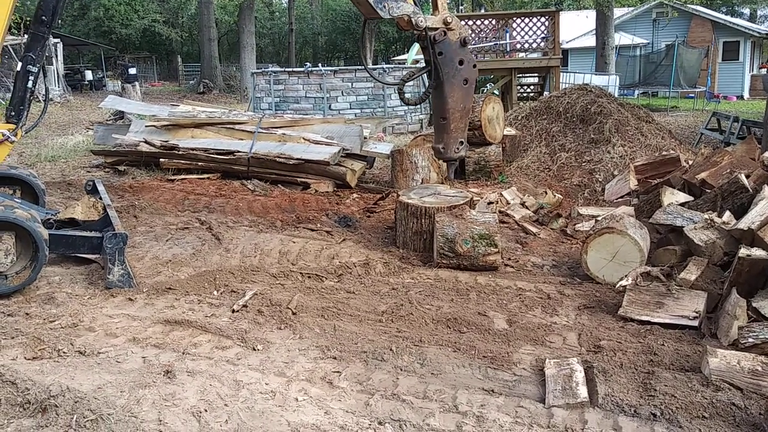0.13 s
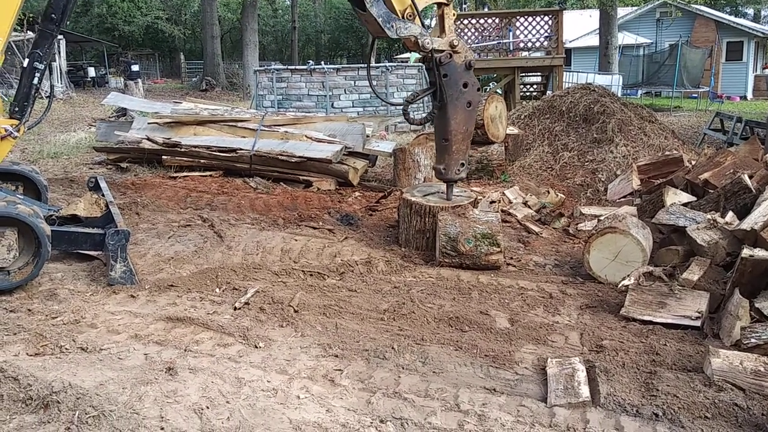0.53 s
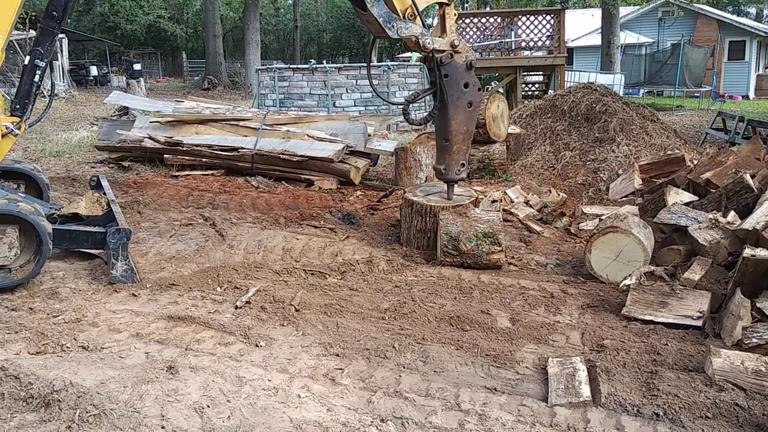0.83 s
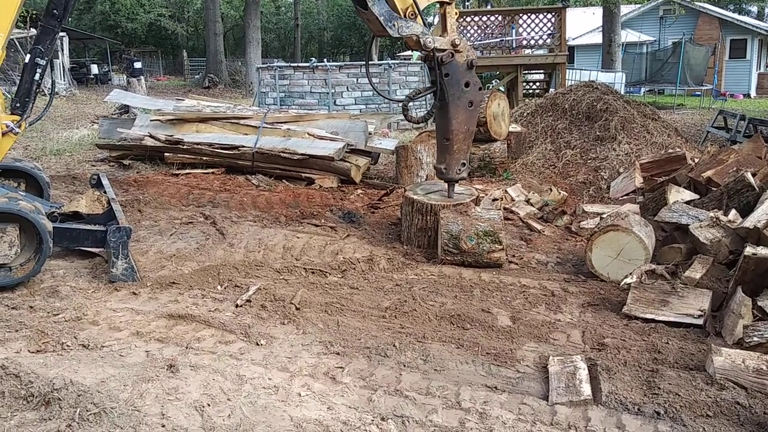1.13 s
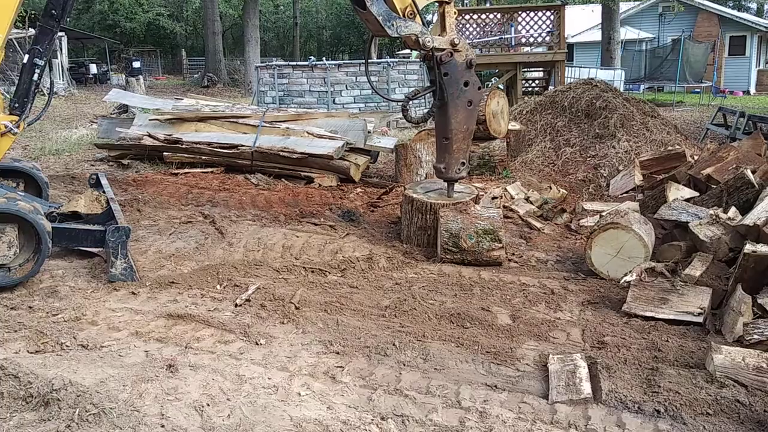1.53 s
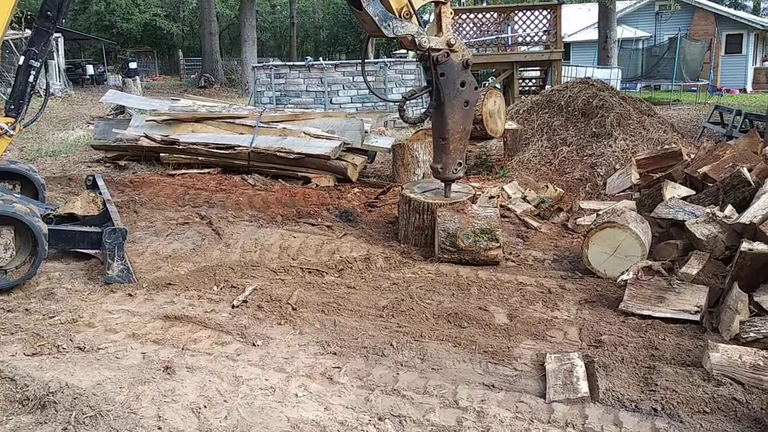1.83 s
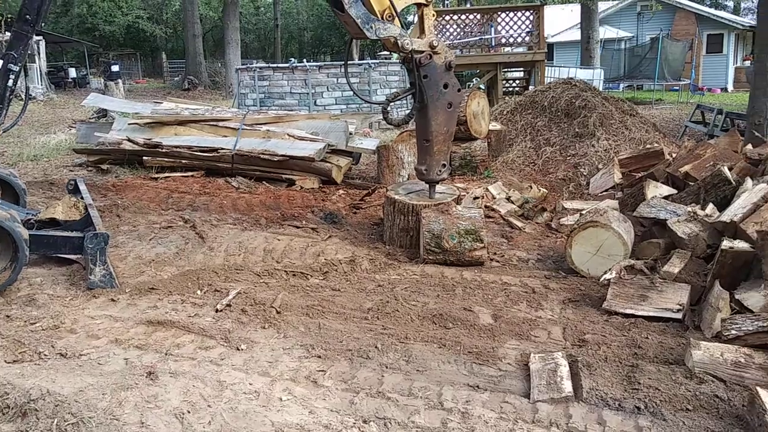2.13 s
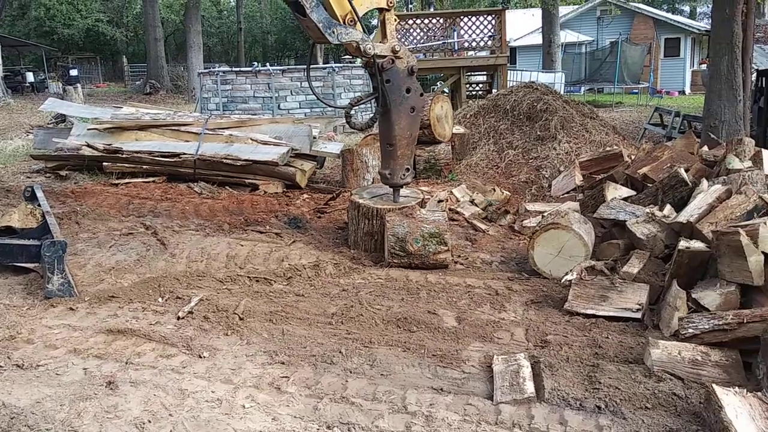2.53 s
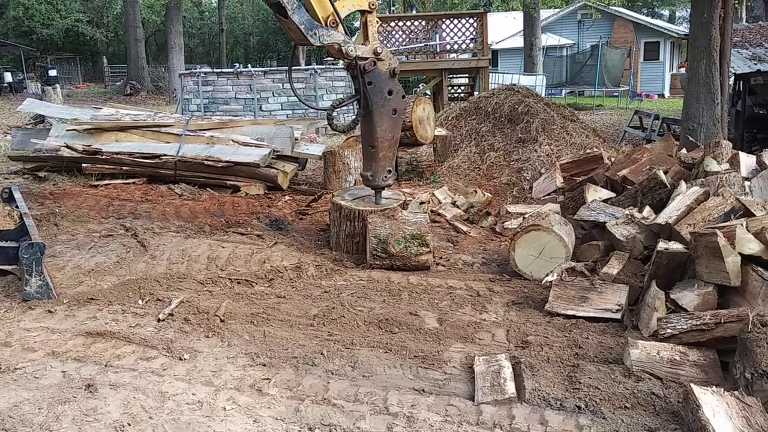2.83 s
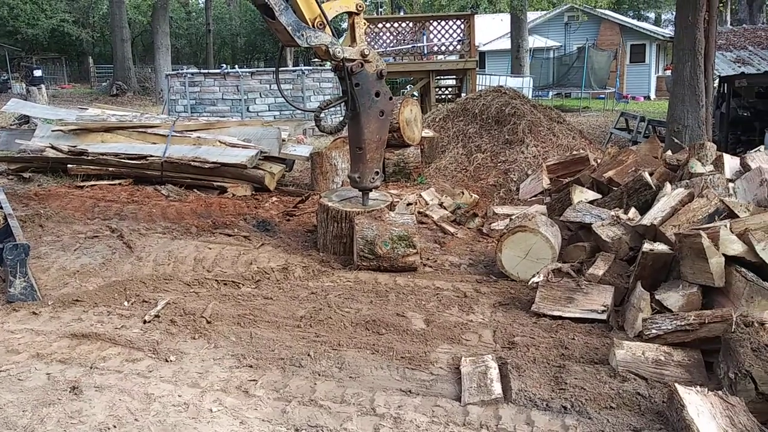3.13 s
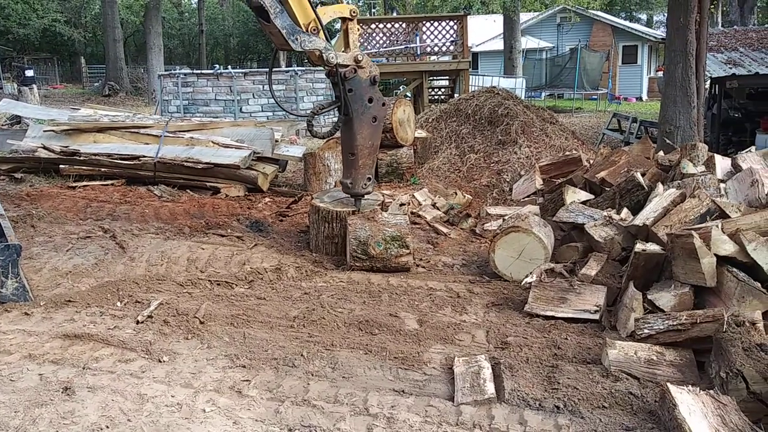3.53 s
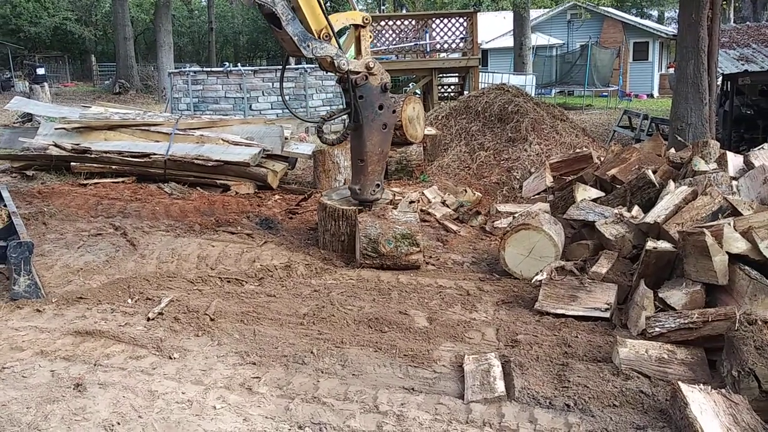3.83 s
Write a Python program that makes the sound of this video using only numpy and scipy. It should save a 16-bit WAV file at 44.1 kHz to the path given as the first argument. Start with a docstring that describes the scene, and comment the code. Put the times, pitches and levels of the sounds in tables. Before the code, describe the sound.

Hydraulic breaker hammers a log in rapid, loud metallic blows over a rumbling diesel engine

```python
"""In a yard, a hydraulic breaker on a small excavator is set down on a log with a clank and a rattle.
It then hammers about 14 times a second: ringing steel, thumps of the log and crashes of noise.
Low knocks and a crackle of short grains tell of tearing wood, and fading noise makes the yard's answer.
Behind, coloured noise and steady tones make a diesel with pump hum and a high whistle.
The blows overload the input."""
import sys
import numpy as np
from scipy import signal
from scipy.fft import rfft, irfft, next_fast_len
from scipy.io import wavfile
from scipy.ndimage import uniform_filter1d, map_coordinates

SR = 44100
rng = np.random.default_rng(int(sys.argv[2]) if len(sys.argv) > 2 else 0)


def waveform_to_disk(signal):
    """Save audio, clipped to [-1, 1], as 16-bit WAV at the path in sys.argv[1]."""
    frames = np.transpose(np.atleast_2d(signal))
    scaled = np.clip(frames, -1, 1) * 32767
    samples = np.round(scaled).astype(np.int16)
    wavfile.write(sys.argv[1], SR, samples)


def convert_level_to_amplitude(level_db):
    """Map a level in decibels to its linear amplitude factor."""
    exponent = np.asarray(level_db, float) / 20
    return 10 ** exponent


N = 176400  # samples, 4 s


def along(points, hz):
    """Reads a curve of (frequency [Hz], value) points on a logarithmic frequency axis."""
    f, v = np.transpose(points)
    return np.interp(np.log(hz + 1), np.log(f + 1), v)


def unit(x):
    """Scales a sound to rms 1."""
    return x / np.sqrt(np.mean(x ** 2) + 1e-20)


def curves(rows):
    """Gives one value per sample for each column after the time."""
    s, *cols = np.transpose(rows)
    return [np.interp(np.arange(N) / SR, s, c) for c in cols]


def wobble(rate):
    """A smooth random curve with rate knots a second."""
    knots = rng.standard_normal(int(N * rate / SR) + 4)
    return map_coordinates(knots, [np.arange(N) * rate / SR])


def coloured(x, gain):
    """Multiplies the spectrum of x by a gain that depends on frequency."""
    m = next_fast_len(len(x) + 8192)
    return irfft(rfft(x, m) * gain(np.fft.rfftfreq(m, 1 / SR)), m)[:len(x)]


def dying(t60s, size, spectrum=((1, 0), (2, 0)), rise=((1, 1e-5),)):
    """Noise whose every frequency swells and dies at its own speed."""
    hz, t, z = signal.stft(rng.standard_normal(size), SR, nperseg=128)
    colour = convert_level_to_amplitude(along(spectrum, hz))[:, None]
    colour = colour / np.sqrt(np.mean(colour ** 2))
    rise_s = np.maximum(along(rise, hz), 1e-5)[:, None]
    swell = 1 - np.exp(-(t + .0007) / rise_s)
    decay = convert_level_to_amplitude(-60 * t / along(t60s, hz)[:, None])
    return signal.istft(z * swell * colour * decay, SR, nperseg=128)[1][:size]


def ring(modes, t, shorter=1, favour_hz=None, slope_db=9.5):
    """Modes that swell to a late peak and die, each a detuned pair with a new level and a wandering phase.

    Levels fall by slope_db per octave away from the nearest favoured frequency."""
    hz, db, t60, late, spread = np.repeat(np.transpose(modes), 2, axis=1)[:, :, None]
    detune, scatter = rng.standard_normal((2,) + hz.shape)
    start = rng.random(hz.shape)
    late = np.maximum(late * shorter, 1e-4)
    swell = np.sin(np.pi / 2 * np.minimum(t / late, 1)) ** 2
    if favour_hz:
        octaves = np.abs(np.log2(hz / np.array(favour_hz))).min(axis=1, keepdims=True)
        db = db - slope_db * octaves
    # the phase takes a random step every 64 samples, larger for a wider spread
    steps = rng.standard_normal((len(hz), len(t) // 64 + 1)) * np.sqrt(.9 * spread * 64 / SR)
    wander = np.repeat(np.cumsum(steps, axis=1), 64, axis=1)[:, :len(t)]
    wander = uniform_filter1d(wander, size=64, axis=1)
    tone = np.sin(2 * np.pi * ((hz + spread * detune) * t + start) + wander)
    decay_db = -60 * np.maximum(t - late, 0) / (t60 * shorter)
    level = convert_level_to_amplitude(db + 1 * scatter + decay_db)  # 1 dB of scatter from strike to strike
    return np.sum(level * swell * tone, axis=0)


# colour of the engine clatter, only its shape counts: (frequency [Hz], level [dB per Hz])
CLATTER_COLOUR = [(26, -51), (45, -28), (202, -10), (271, -16), (401, -16.5), (465, -17), (552, -12),
                  (1710, -12.5), (4460, -27.5), (7850, -20.5), (11100, -51), (16000, -48)]
# loudness of the clatter before a 1.5 dB cut and a random waver: (time [s], level [dB])
CLATTER_LEVEL = [ [(0.0, -28.5), (0.128, -33), (0.52, -30.5)], ][0] + [(.9, -31), (1.2, -34.5), (4, -26)]


def clatter(turns):
    """Diesel clatter: coloured noise that pulses a little with each firing."""
    level_db, = curves(CLATTER_LEVEL)
    noise = unit(coloured(rng.standard_normal(N), lambda hz: convert_level_to_amplitude(along(CLATTER_COLOUR, hz))))
    pulse = 1 + 0.11 * np.cos(2 * np.pi * turns)
    return noise * pulse * convert_level_to_amplitude(level_db - 1.5 + 2.4 * wobble(8))


# shaft and pump tones, before a 1.5 dB cut and a random waver: (multiple of firing rate [x], level [dB])
SHAFT_TONES = [(2, -56), (3, -52), (5.5, -80.5), (6, -44.5), (11, -43), (12, -43.5), (16, -44.5), (48, -42),
               (60, -47)]


def shaft_and_pump(turns):
    """Hum of shaft and pump: sine tones locked to the firing, each wavering in level."""
    hum = np.zeros(N)
    for k, db in SHAFT_TONES:
        level = convert_level_to_amplitude(db - 1.5 + 1.34 * wobble(26))
        hum += level * np.sin(2 * np.pi * k * turns + k * k)
    return hum


# the high whistle glides and fades: (time [s], frequency [Hz], level [dB])
WHISTLE_PATH = [(0, 7850, -37), (.3, 7920, -44), (.5, 7900, -34), (.7, 8000, -60), (1.2, 7440, -66),
                (4, 8500, -55)]


def whistle():
    """A hissing whistle: two slow noises carried by a gliding tone make one narrow band."""
    width_hz = 330  # half amplitude this far to either side
    hz, db = curves(WHISTLE_PATH)
    in_phase, quarter_turn = [
        unit(coloured(rng.standard_normal(N), lambda f: 1 / (1 + (f / width_hz) ** 2))) for _ in range(2)]
    phase = 2 * np.pi * np.cumsum(hz) / SR
    return convert_level_to_amplitude(db) * (in_phase * np.cos(phase) + quarter_turn * np.sin(phase))


def engine():
    """The diesel: clatter and tones share one slightly uneven firing rate; the whistle is free of it."""
    firing_hz = 34.62 * (1 + 0.0042 * wobble(1.8))
    turns = np.cumsum(firing_hz) / SR  # firings so far
    return clatter(turns) + shaft_and_pump(turns) + whistle()


# how long the yard's answer takes to fall by 60 dB: (frequency [Hz], t60 [s])
YARD_T60 = [(200, 0.32), (1000, 0.48), (4000, 0.8), (9000, 0.7)]


def yard(x):
    """Houses, trees and wood piles answer with dying noise; a new tail for each short stretch."""
    delay_s, level_db = .025, -7.5
    out, step = np.zeros(N + 2 * SR), SR // 8
    for i in range(0, N, step):
        tail = dying(YARD_T60, SR)
        wet = signal.fftconvolve(x[i:i + step], tail / np.linalg.norm(tail))
        out[i + round(delay_s * SR):][:len(wet)] += wet
    return convert_level_to_amplitude(level_db) * out[:N]


# the log rocks, then gives way: (time [s], frequency [Hz], level [dB], t60 [s])
LOG_KNOCKS = [(.555, 203, -18, 0.071), (0.813, 253, -24, 0.084), (3.703, 212, -2, 0.056),
              (3.74, 342, -7, 0.069), (3.794, 409, -9.5, 0.084)]


def knocks():
    """Low knocks of the log: sine tones that start softly and die away."""
    out = np.zeros(N)
    for s, hz, db, t60 in LOG_KNOCKS:
        t = np.maximum(np.arange(N) / SR - s, 0)
        out += convert_level_to_amplitude(db - 60 * t / t60) * (1 - np.exp(-t / 0.0056)) * np.sin(2 * np.pi * hz * t)
    return out


# loudness of the tearing wood: (time [s], level [dB])
TEARING_LEVEL = [(0, -60), (3.0, -68), (3.3, -24.5), (3.55, -22.5), (3.75, -24), (3.82, -21.5), (4, -50)]


def splinters():
    """Tearing fibres: a crackle of short dying tones at random times, pitches and sizes."""
    count, middle_hz, spread_octaves, sizes_db, cycles = 900, 1087, 1.056, 6.5, 3
    pitch, size = rng.standard_normal((2, count, 1))
    when = rng.uniform(3 * SR, N, (count, 1)).astype(int)  # from 3 s on
    hz = np.clip(middle_hz * 2 ** (spread_octaves * pitch), 350, 8000)
    k = np.arange(1500)
    decay = np.exp(-k * hz / (SR * cycles))
    grains = convert_level_to_amplitude(sizes_db * size) * decay * np.sin(2 * np.pi * hz * k / SR)
    crackle = np.bincount((when + k).ravel(), grains.ravel(), N + len(k))[:N]
    level_db, = curves(TEARING_LEVEL)
    return convert_level_to_amplitude(level_db) * crackle / np.std(crackle[3 * SR:])


# colour of a strike's noise, only its shape counts: (frequency [Hz], level [dB per Hz])
CRASH_COLOUR = [(35, -69), (60, -25.5), (492, 1), (1550, -3.5), (2000, 5), (3500, -6), (4530, 0.5),
                (6000, -12), (7750, 2.5), (9350, -23), (16000, -40)]
# decay of a blow's noise, scaled by "shorter" for other strikes: (frequency [Hz], t60 [s])
CRASH_DECAY = [(100, 0.32), (500, 0.32), (2000, 0.17), (5000, 0.17), (10000, 0.15)]
# how slowly that noise swells, scaled likewise: (frequency [Hz], rise [s])
CRASH_SWELL = [(300, 0.021), (1000, 0.0032), (3000, 0.0046), (6000, 0.0027)]
# thump of log and housing, times scaled by the root of "shorter":
# (frequency [Hz], level [dB], t60 [s], peak after [s], spread [Hz])
LOG_MODES = [(231.7, -1, 0.11, 0.0064, 8), (365.6, -13, 0.16, .018, 3.9), (448.5, -8, 0.05, 0.038, 10.7),
             (500, -6.5, .2, 0.017, 4.5), (589.2, -7, .2, 0.013, 5.6), (659.7, -8.5, 0.15, 0.031, 8.7),
             (757.3, -18.5, 0.18, 0.048, 5.5), (1005.3, -11.5, 0.075, 0.021, 9.6)]
# the log's favoured tone as the tool sinks in: (time [s], frequency [Hz])
LOG_FAVOURED = [(0, 603), (1.2, 500), (1.9, 520), (2.2, 615), (3, 560), (3.3, 670), (3.7, 517)]


def strikes(events, steel_ring, crash_over_db, shorter):
    """Each strike rings the steel, thumps the log and throws a crash of noise."""
    out, t = np.zeros(N + SR), np.arange(SR // 4) / SR
    fade = np.clip((t[-1] - t) / .05, 0, 1)
    decay = [(hz, t60 * shorter) for hz, t60 in CRASH_DECAY]
    swell = [(hz, rise * shorter) for hz, rise in CRASH_SWELL]
    for s, crash_db, steel_db, log_db, *colour in events:
        crash = convert_level_to_amplitude(crash_db + crash_over_db) * dying(decay, len(t), CRASH_COLOUR, swell)
        steel = convert_level_to_amplitude(steel_db) * steel_ring(t, *colour)
        favour_hz = np.interp(s, *np.transpose(LOG_FAVOURED))
        thump = convert_level_to_amplitude(log_db) * ring(LOG_MODES, t, np.sqrt(shorter), favour_hz)
        out[round(s * SR):][:len(t)] += fade * (crash + steel + thump)
    return out[:N]


# the loose tool, before its times are shortened to 0.78:
# (frequency [Hz], level [dB], t60 [s], peak after [s], spread [Hz])
LOOSE_MODES = [(2030, 0, .035, .004, 30), (2250, -3, .035, .003, 40), (3150, 0, .03, .003, 30),
               (3800, -6, .045, .002, 20), (4600, 3, .04, .005, 20), (6600, -6, .03, .003, 60),
               (7800, -3, .035, .002, 100)]
# clanks of the loose tool, mostly as it is set down:
# (time [s], crash level [dB], steel level [dB], log level [dB], favoured [Hz], also favoured [Hz])
CLANK_EVENTS = [(.543, -7.5, -9.5, -13.5, 2000, 4600), (.568, -7, -9, -6.5, 2200, 3800),
                (.653, -14, -21, -21, 2260, 7800), (.689, -19, -29, -30, 3800, 7800),
                (.76, -23, -38, -30, 4600, 7800), (.81, -32, -21, -25.5, 3750, 3750),
                (.962, -20.5, -11, -16.5, 2020, 2960), (1.043, -19, -47, -22.5, 2250, 4600),
                (1.069, -32, -29, -24, 2250, 3150), (3.991, -18, -17, -22, 3700, 3800)]


def clanks():
    """The loose tool clanks: short rings, each strong near two favoured tones."""
    def loose_tool(t, *favour_hz):
        """The loose steel drops 50 dB per octave away from its favoured tones."""
        return ring(LOOSE_MODES, t, 0.78, favour_hz, slope_db=50)
    return strikes(CLANK_EVENTS, loose_tool, crash_over_db=0, shorter=0.45)


# breaker steel: (frequency [Hz], level [dB], t60 [s], peak after [s], spread [Hz])
STEEL_MODES = [(1162.3, -7.5, 0.045, 0.024, 6.1), (1455, -24.5, .1, 0.0071, 15),
               (1833, -13.5, 0.22, 0.026, 42), (1942, -2.5, 0.023, 0.022, 21),
               (2020, -8, 0.37, 0.0092, 52.6), (2382, -8.5, 0.25, 0.0079, 88.8),
               (4390, -14, 0.23, 0.051, 40.6), (4533, 1, 0.021, 0.00094, 63), (5290, -18, 0.21, 0.0034, 15),
               (6298, -14, .3, .03, 3), (11410, -35, .2, .02, 20), (7040, -15, 0.6, 0.0035, 49.6),
               (7660, -11, 0.15, 0.062, 33.6), (8000, -11, 0.21, 0.0035, 65)]
# short clang of the tool: (frequency [Hz], level [dB], t60 [s], peak after [s], spread [Hz])
TOOL_MODES = [(3210, -8, 0.017, 0.01, 62)]
# piston blows, the crash still to be raised by 16 dB:
# (time [s], crash treble level [dB], steel level [dB], log level [dB], tool clang over steel [dB])
BLOW_EVENTS = [(1.2102, -20.5, -9.5, -13, 5), (1.2856, -21.5, -12, -12.5, 6.5), (1.3598, -23, -9.5, -9, 4),
               (1.4374, -22, -9.5, -9, 1), (1.5096, -21, -12, -10.5, 7), (1.5869, -20.5, -12, -14.5, 2),
               (1.6647, -20.5, -11, -10, 5), (1.7368, -22, -10.5, -13.5, -4),
               (1.8122, -20, -13.5, -10.5, 15), (1.8824, -20.5, -13, -16.5, 7),
               (1.9575, -20.5, -11, -15, 7), (2.0289, -21, -11.5, -12.5, -21),
               (2.1022, -21, -10.5, -15.5, 2), (2.1733, -20.5, -11.5, -13, 7),
               (2.2465, -22.5, -10, -8.5, -5), (2.3185, -20, -11, -13, -15), (2.3894, -21, -11, -13.5, -7),
               (2.4604, -20, -10.5, -15.5, 2), (2.5312, -20.5, -12.5, -16, 9.5),
               (2.6009, -21.5, -9, -15, -13), (2.67, -22, -9, -13, 4), (2.7388, -20, -12.5, -17, 4),
               (2.8091, -21, -11, -13.5, -6), (2.8769, -20, -14, -13, 5.5), (2.9459, -21, -9, -13.5, 2),
               (3.0176, -20.5, -9, -11.5, 1), (3.0867, -20, -14.5, -10, -11),
               (3.1569, -20.5, -13, -7.5, 11.5), (3.2268, -21, -11, -4.5, 2), (3.2965, -19.5, -12, -11, 6),
               (3.3675, -20, -12.5, -10.5, 9.5), (3.4374, -19.5, -12, -11, -11),
               (3.5064, -20, -9, -10.5, 7), (3.5772, -19, -12.5, -12, -12), (3.6458, -18, -8.5, -14, -14),
               (3.7183, -18, -12, -20, -1), (3.7884, -23, -16.5, -20, 3)]


def blows():
    """The piston hammers: each blow rings the breaker steel and adds a short clang of the tool."""
    def breaker(t, clang_db):
        """Steel and tool ring together."""
        return ring(STEEL_MODES, t) + convert_level_to_amplitude(clang_db) * ring(TOOL_MODES, t)
    return strikes(BLOW_EVENTS, breaker, crash_over_db=16, shorter=1)


def scene():
    """Strikes and splitting wood, answered by the yard, over the engine."""
    background = engine()
    hits = knocks() + splinters() + clanks() + blows()
    return (background + yard(hits) + hits)[None]


def band_limit(x):
    """A steep low-pass at the top of the band."""
    return signal.sosfilt(signal.butter(12, 16620, fs=SR, output="sos"), x)


def record(dry):
    """The input overloads softly, then loses its deep bass and its top."""
    ceiling, knee = .8, 3  # a higher knee bends more sharply
    low_cut_hz, top_hz = 86, 15900
    clipped = dry[0] / (1 + np.abs(dry[0] / ceiling) ** knee) ** (1 / knee)
    mix = coloured(clipped, lambda hz: (hz < top_hz) * hz / np.hypot(hz, low_cut_hz))
    return band_limit(mix[None])


dry = scene()
out = record(dry)
waveform_to_disk(out)
```